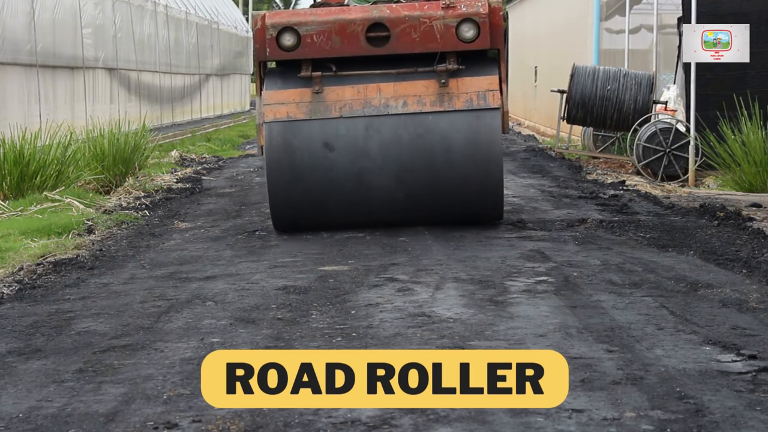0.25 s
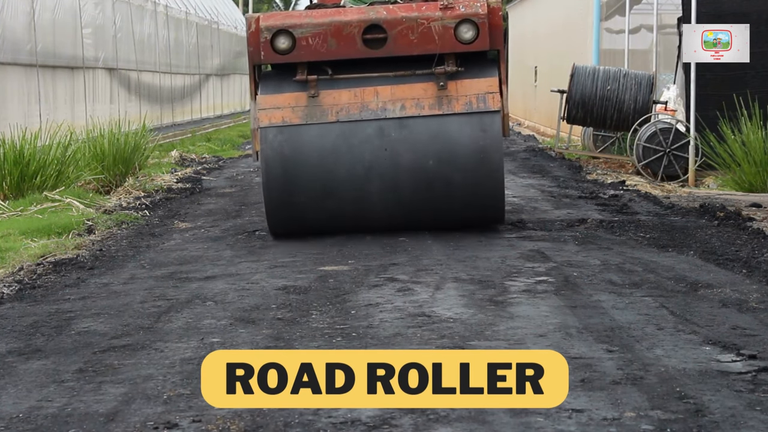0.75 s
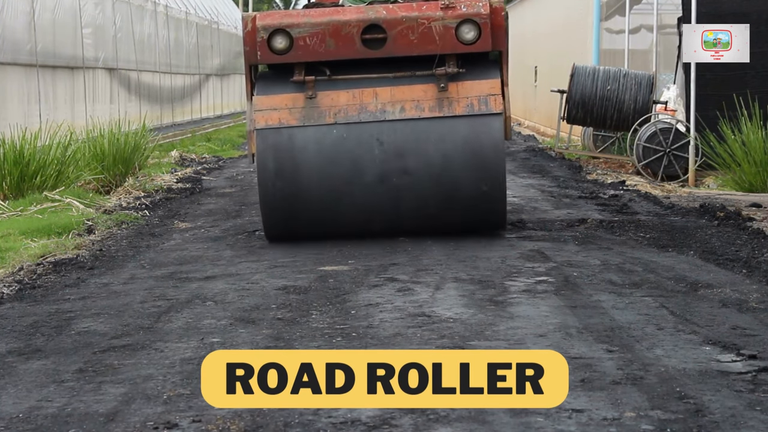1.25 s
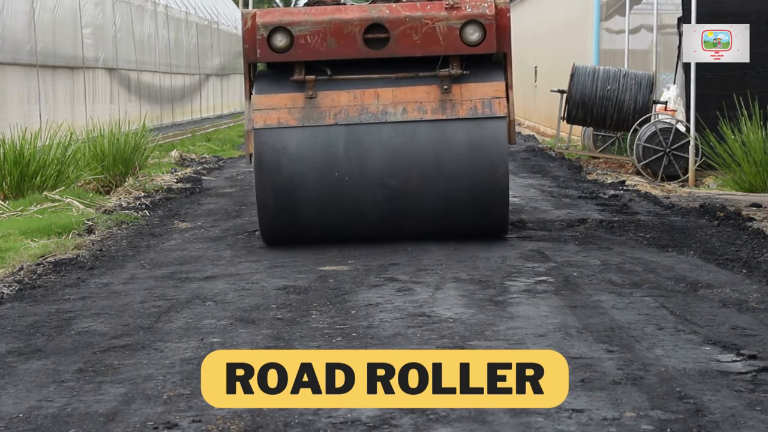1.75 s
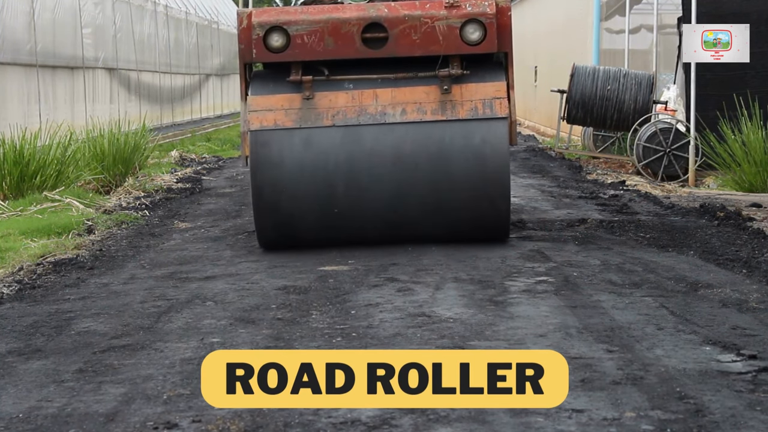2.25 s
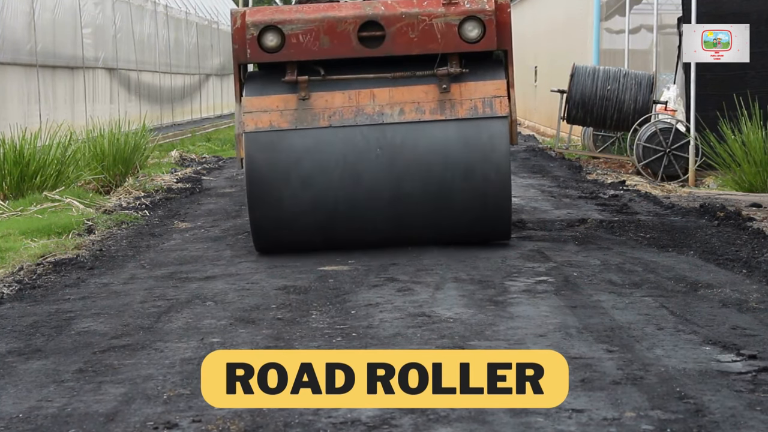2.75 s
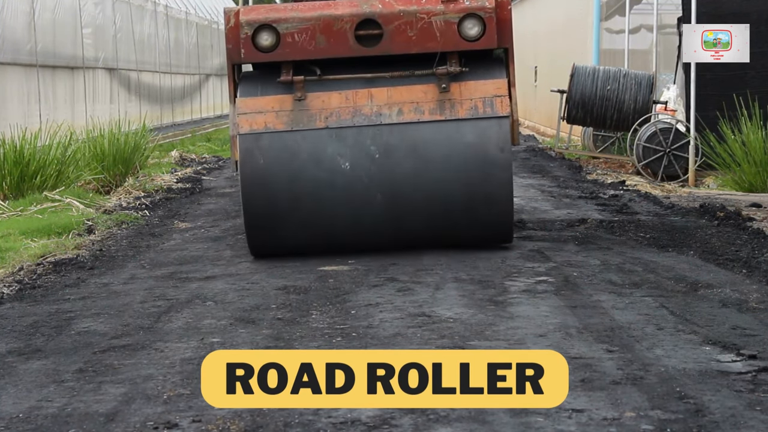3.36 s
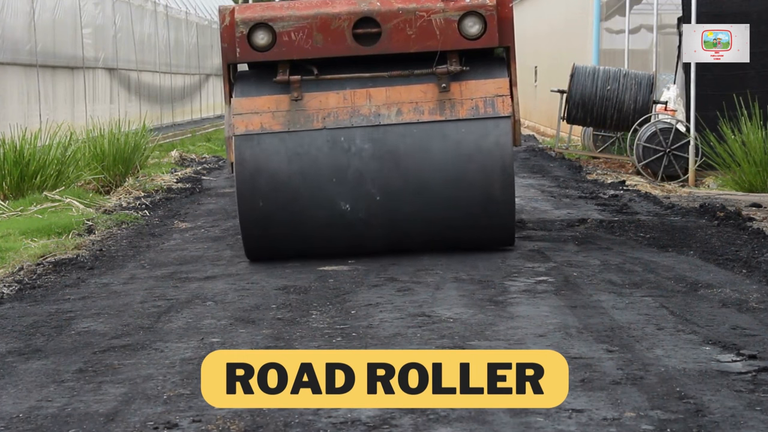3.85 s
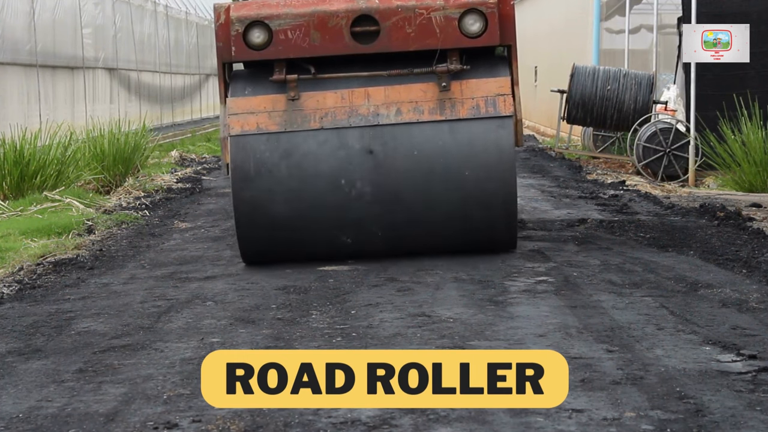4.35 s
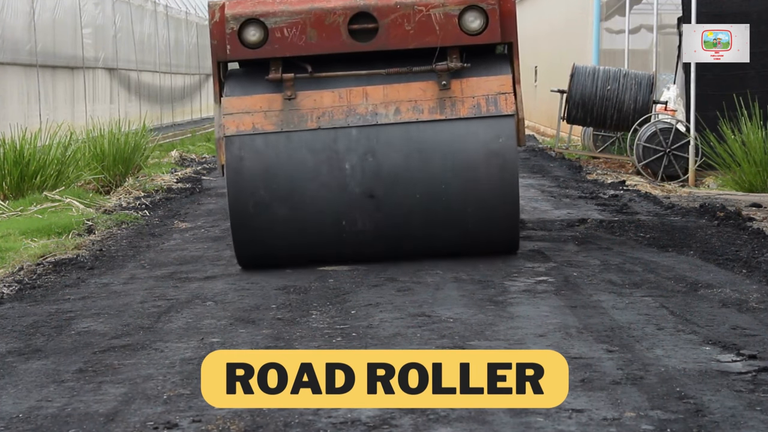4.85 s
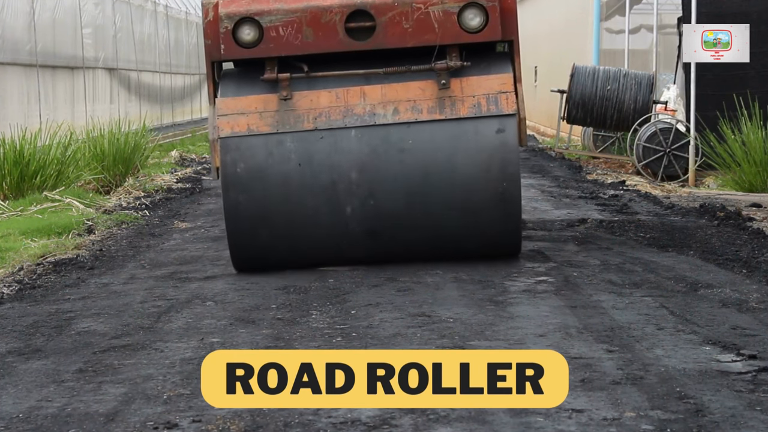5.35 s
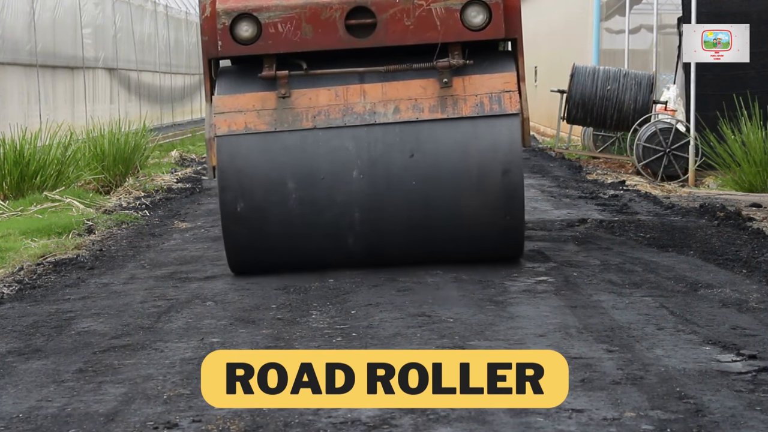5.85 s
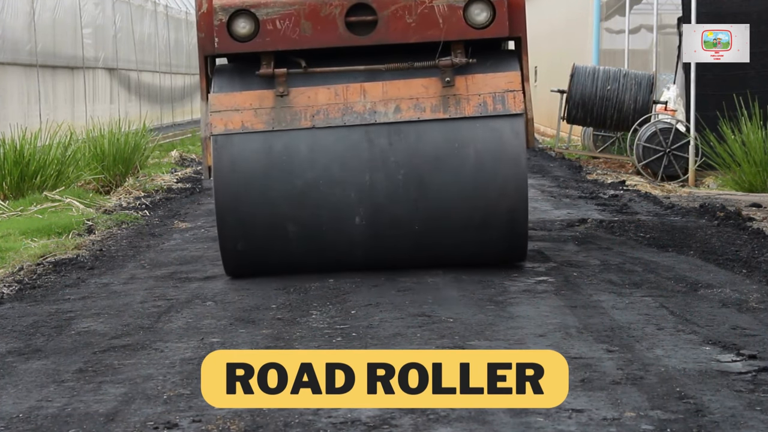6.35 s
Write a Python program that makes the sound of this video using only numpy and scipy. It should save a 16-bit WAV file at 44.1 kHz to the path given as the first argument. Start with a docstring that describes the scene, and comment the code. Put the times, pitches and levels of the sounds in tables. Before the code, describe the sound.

The diesel engine of a small road roller chugs throughout, its pump humming and dipping slightly in pitch under load. Over it the steel drum crunches across fresh asphalt, with clusters of cracking stones, short rumbles and faint thin metal squeaks. One brief falling creak comes near the end. It is heard from nearby in stereo, outdoors between walls that add a very short echo.

```python
"""A lane between sheds, with a small road roller at work.
Its diesel throbs and clatters at multiples of the firing rate, and the hydraulic pump hums in step.
Stones grind and crack under the steel drum and excite its modes; friction at the scraper makes the
shell squeak, and near the end the frame creaks once. The walls reflect a short blur of the drum."""
import sys
import numpy as np
from scipy import signal
from scipy.fft import rfft, irfft, next_fast_len
from scipy.io import wavfile
from scipy.ndimage import uniform_filter1d

SR = 44100
rng = np.random.default_rng(int(sys.argv[2]) if len(sys.argv) > 2 else 0)


def master(y):
    """Save y as 16-bit WAV."""
    cut = np.clip(np.atleast_2d(y).T, -1, 1)
    pcm = np.round(cut * 32767)  # scale
    wavfile.write(sys.argv[1], SR, pcm.astype(np.int16))


N = 290879
TIME = np.arange(N) / SR
TAIL = np.arange(SR // 4) / SR  # time within one decay, s


def gain_of(db):
    """Amplitude ratio of a level in decibels."""
    return 10 ** (np.asarray(db) / 20)

def unit_rms(x):
    """Normalisation to rms 1."""
    return x / np.sqrt(np.mean(x ** 2) + 1e-20)

def spectrum_at(points, hz):
    """Interpolation on a logarithmic frequency axis."""
    f, value = np.transpose(points)
    return np.interp(np.log(hz + 1), np.log(f + 1), value)

def coloured(x, points):
    """Minimum-phase filter of unit energy, shaped by a dB spectrum."""
    log_gain = spectrum_at(points, abs(np.fft.fftfreq(8192, 1 / SR))) * np.log(10) / 20
    taps = np.fft.ifft(np.exp(np.conj(signal.hilbert(log_gain)))).real[:4096]
    return signal.oaconvolve(x, taps / np.linalg.norm(taps))[:len(x)]

def passband(x, hz, kind, order=3):
    """Maximally flat filter."""
    return signal.sosfilt(signal.butter(order, hz, kind, fs=SR, output="sos"), x)

def resonate(x, hz, width):
    """Damped resonance: a double pole, gain 1 at its centre."""
    radius = np.exp(-np.pi * width / SR)
    pole = [1, -radius * np.exp(2j * np.pi * hz / SR)]
    return 2 * signal.lfilter([1 - radius], pole, signal.lfilter([1 - radius], pole, x)).real

def drift(per_s):
    """Low-pass random fluctuation, rms 1."""
    span = max(round(SR / per_s), 2)
    return unit_rms(uniform_filter1d(uniform_filter1d(rng.standard_normal(N), span), span))

def tone(turns, db, waver_db, per_s):
    """Sinusoid with random amplitude modulation about an rms level."""
    return -np.sqrt(2) * gain_of(db + waver_db * drift(per_s)) * np.cos(2 * np.pi * turns)

def splinters(per_s, spread_db):
    """Shot noise: small fractures of uneven size, rms 1."""
    size = gain_of(spread_db * np.minimum(rng.exponential(1, N), 4))
    return unit_rms(size * rng.standard_normal(N) * (rng.random(N) < per_s / SR))

def swells(starts, holds, dbs, floor_db, rise_db_per_s=234, fall_db_per_s=101):
    """Power sum of a steady floor and envelopes that rise, hold and fall."""
    t = np.arange(0, N + 64, 64)[:, None] / SR
    db = dbs - rise_db_per_s * np.maximum(starts - t, 0)
    db -= fall_db_per_s * np.maximum(t - starts - holds, 0)
    return np.interp(TIME, t[:, 0], np.sqrt(gain_of(floor_db) ** 2 + (gain_of(db) ** 2).sum(1)))


# Pump frequency, which follows the engine and sags under load: t/s, f/Hz
PUMP_SPEED = [(0, 255), (.2, 256.5), (.5, 249.5), (1, 258.5), (1.3, 253.5), (1.8, 252), (2.2, 259.5),
              (2.45, 247.5), (2.72, 260), (3.25, 258), (3.55, 244.5), (4.3, 245), (5, 249.5), (5.4, 257),
              (5.7, 254.5), (6.6, 257)]
PULSES_PER_FIRING = 4.72

def exhaust():
    """Periodic firing radiates three harmonics; returns their sound and the firing phase in turns."""
    free_hz, full_sag_hz, governor_s, load_db_per_hz = 260, 24, 0.096, 0.72
    silencer_hz, silencer_width_hz = 164, 4.2
    pump_hz = np.interp(TIME, *np.transpose(PUMP_SPEED))
    firings = np.cumsum(pump_hz) / SR / PULSES_PER_FIRING
    sag_hz = free_hz - np.interp(TIME - governor_s, TIME, pump_hz)
    # load swells the throb, a little late
    throb_db = -27.5 + load_db_per_hz * full_sag_hz * np.tanh(sag_hz / full_sag_hz)
    second_db = throb_db.mean() - 12 + 0.78 * (throb_db - throb_db.mean())
    # the third harmonic peaks as it meets the silencer's resonance
    detuning = 2 * (3 * pump_hz / PULSES_PER_FIRING - silencer_hz) / silencer_width_hz
    third_db = -29 - 10 * np.log10(1 + detuning ** 2)
    throb = tone(firings, throb_db, waver_db=1.2, per_s=25)
    return throb + tone(2 * firings, second_db, 3.5, 14) + tone(3 * firings, third_db, 3.1, 12), firings


# Tones geared to the pump: f/pump frequency, level/dB
GEAR_TONES = [(1.428, -36.5)]

def hydraulic_pump(firings):
    """Pressure pulsation: a hum tied to engine speed, wandering slightly in phase."""
    turns = firings * PULSES_PER_FIRING + 0.081 * drift(8.2)
    hum = tone(turns, -26.5, waver_db=0.94, per_s=14)
    return hum + sum(tone(ratio * turns, db, 3.5, 10) for ratio, db in GEAR_TONES)


# Spectral density of the machine's noise: f/Hz, relative level/dB
ROAR_SPECTRUM = [(18, -45), (33, 7.5), (80, -4.5), (130, 1.5), (225, -10.5), (290, -7), (500, -7.5),
                 (1100, -10.5), (2000, -21), (2800, -34), (5400, -31), (7200, -44), (12400, -107.5)]
# Modes of the engine block: f/Hz, width/Hz, gain/dB
BLOCK_MODES = [(615.5, 84, -3), (2040, 305, 0.5), (3400, 870, 3), (5340, 460, -3)]

def machine_roar(firings, coherence):
    """Partly coherent stereo noise excites the block; above 350 Hz it knocks twice a firing."""
    size = 2 * (len(coherence) - 1)
    shared, *own = rfft(rng.standard_normal((3, N)), size)
    noise = irfft(np.sqrt(coherence) * shared + np.sqrt(1 - coherence) * np.array(own), size)[:, :N]
    body = np.array([coloured(side, ROAR_SPECTRUM) for side in noise])
    body += sum(gain_of(db) * resonate(body, hz, width) for hz, width, db in BLOCK_MODES)
    clatter = passband(body, 350, "high", order=2)
    knock = gain_of(1.8 * np.cos(4 * np.pi * firings) + .8 * drift(25))
    return gain_of(-21.5 + 0.81 * drift(6.3)) * (body + (knock - 1) * clatter)


# Spectral density of breaking stone: f/Hz, relative level/dB
STONE_SPECTRUM = [(120, 2), (300, 8), (800, -2), (1150, -2.5), (1750, -0.5), (2780, -9), (4080, -19.5),
                  (6630, -26.5), (10500, -42), (12400, -49.5), (15000, -70)]
# Stone yielding in surges: t/s, hold/s, grinding level/dB, rumble drive/dB, favoured rumble f/Hz
STONE_SURGES = [(0.468, 0.075, -21, -14.5, 213), (0.757, 0.056, -21.5, -39, 252),
                (1.77, 0.019, -19.5, -16, 260), (2.355, 0.21, -31, -39, 202),
                (3.103, 0.071, -18.5, -14.5, 433), (3.355, 0.14, -23, -22, 179),
                (3.515, 0.82, -27.5, -44, 240), (4.394, 0.072, -20.5, -18.5, 600),
                (4.56, 0.038, -17, -21, 300), (4.604, 0.024, -21.5, -18, 302),
                (4.995, 0.044, -25, -20, 200), (5.173, 0.28, -25.5, -30.5, 300),
                (5.434, 0.045, -20, -16.5, 249), (6.416, 0.046, -26.5, -26, 257)]

def grinding():
    """Dense microfractures merge into noise; pebbles rattle under the same surging envelope."""
    pebble_t60_s = 0.048
    start, hold, grind_db, _, _ = np.transpose(STONE_SURGES)
    pressing = swells(start, hold, grind_db, floor_db=-30.5)
    grind = gain_of(1.5 * drift(40)) * coloured(splinters(7000, 1.1), STONE_SPECTRUM)
    hits = abs(splinters(per_s=280, spread_db=1.0))
    pebbles = signal.oaconvolve(hits, gain_of(-60 * TAIL / pebble_t60_s))[:N] * rng.standard_normal(N)
    grit = unit_rms(passband(pebbles, [1800, 5500], "band"))
    return pressing * (grind + gain_of(-13) * grit)


# Low modes of the drum shell: f/Hz, width/Hz, gain/dB
DRUM_MODES = [(120, 153, 1.5), (180, 49, 2), (297.4, 57, 0), (435.4, 27, -5), (839, 58, 3)]

def drum_rumble():
    """Forced vibration: small blows drive the shell, most near each surge's favoured frequency."""
    start, hold, _, drive_db, favoured_hz = np.transpose(STONE_SURGES)
    blows = splinters(per_s=1500, spread_db=1.5)
    blows[np.round(start * SR).astype(int)] = gain_of(37.5)  # a thud opens each surge
    rumble = np.zeros(N)
    for hz, width, db in DRUM_MODES:
        octaves = abs(np.log2(hz / favoured_hz))
        drive = swells(start, hold, drive_db - 14 * octaves, floor_db=-32)
        rumble += gain_of(db) * resonate(drive * blows, hz, width)
    return gain_of(17.5) * rumble


# Single stones breaking: t/s, relative level/dB, ring f/Hz, brightness/dB, T60/s
STONE_CRACKS = [(0.3693, -13.5, 1860, -15.5, 0.097), (0.4548, -18, 1560, -28, 0.2),
                (0.5065, -5, 1450, -20, 0.12), (0.525, -18, 2090, -23, 0.14), (0.742, -15, 2110, -16, 0.13),
                (0.758, -5.5, 1990, -18, 0.07), (0.794, -3.5, 1820, -22.5, 0.054),
                (0.835, -16, 1760, -17, 0.17), (1.672, -10, 1640, -19, 0.18),
                (1.774, 0.5, 1650, -19.5, 0.11), (1.855, -12.5, 1580, -20.5, 0.065),
                (2.325, -14.5, 1770, -12.5, 0.15), (2.379, -12, 1850, -23, 0.14),
                (2.4142, -11.5, 1700, -20, 0.25), (3.0768, -4.5, 1690, -21.5, 0.13),
                (3.089, -7.5, 1930, -15, 0.034), (3.1095, -8, 1720, -31, 0.027),
                (3.123, -19, 1720, -29, 0.034), (3.1732, -8, 1570, -23.5, 0.23),
                (3.3523, -0.5, 1720, -18, 0.17), (3.4458, -0.5, 2050, -17, 0.16),
                (3.7844, -12.5, 2110, -10.5, 0.1), (4.082, -16.5, 1640, -11.5, 0.091),
                (4.388, -2.5, 960, -16.5, 0.16), (4.514, -14, 1480, -9, 0.13),
                (4.5338, -10, 1800, -11, 0.16), (4.576, -8, 1430, -14.5, 0.13),
                (4.605, -3, 1450, -13.5, 0.11), (4.632, -7, 1470, -17.5, 0.11),
                (4.662, -20, 1520, -3.5, 0.1), (4.922, -5.5, 2150, -19.5, 0.11),
                (4.991, -6.5, 1450, -16, 0.2), (4.9988, -4, 1640, -19.5, 0.1),
                (5.0458, -1.5, 1440, -13.5, 0.16), (5.109, -17.5, 1310, -8, 0.16),
                (5.167, -6, 1590, -15.5, 0.094), (5.3707, -15.5, 1480, -6.5, 0.1),
                (5.427, -12, 1450, -23, 0.15), (5.4471, -3, 1510, -12.5, 0.058),
                (5.5146, -2, 1720, -15.5, 0.11), (6.059, -16.5, 1730, -24.5, 0.08),
                (6.112, -13, 1190, -15, 0.17), (6.1837, -8, 2610, -10.5, 0.13),
                (6.333, -16.5, 1230, -9, 0.082), (6.4014, -0.5, 1800, -22.5, 0.13)]
# Higher modes of the steel, excited by every crack: f/Hz, width/Hz, gain/dB
CLANG_MODES = [(2525, 280, -12), (3310, 510, -9), (5000, 880, -24.5), (6700, 500, -21.5)]

def stone_cracks():
    """Brittle fracture: a snap and a decaying spray of splinters set the steel ringing."""
    dull, bright, ring = np.zeros((3, N + SR))
    chips = splinters(per_s=11000, spread_db=1.8)
    snaps = np.round(np.array(STONE_CRACKS)[:, 0] * SR + 26).astype(int)
    chips[snaps] = gain_of(15.5)  # the stone snaps before it splinters
    attack_s, bite_s, snap_s = 0.0016, 0.004, 0.0015
    for start, db, hz, bright_db, t60 in STONE_CRACKS:
        spray = gain_of(db - 60 * TAIL / t60) * np.minimum(TAIL / attack_s, 1)
        spray *= 1 + .7 * np.exp(-TAIL / bite_s)
        part = slice(round(start * SR), round(start * SR) + len(TAIL))
        dull[part] = np.hypot(dull[part], spray)
        bright[part] = np.hypot(bright[part], gain_of(bright_db) * spray)
        blow = np.resize(chips[part], len(TAIL)) * spray * (1 + gain_of(-4) * np.exp(-TAIL / snap_s))
        blow[0] = gain_of(db + 20.5)  # the opening strike
        dullness_db = -15 - bright_db  # dull cracks ring more and clang less
        ring[part] += gain_of(dullness_db) * resonate(blow, hz, width=400)
        for mode_hz, width, mode_db in CLANG_MODES:
            ring[part] += gain_of(mode_db - dullness_db / 2) * resonate(blow, mode_hz, width)
    low = passband(coloured(chips * dull[:N], STONE_SPECTRUM), [600, 4000], "band")
    high = passband(coloured(chips * bright[:N], STONE_SPECTRUM), 4000, "high")
    return gain_of(-8.5) * low + gain_of(16) * high + gain_of(-1) * ring[:N]


# Narrow high modes of the shell: f/Hz
SQUEAK_MODE_HZ = [5180, 6858, 7655, 8188, 8463, 9615, 10420, 12285]
# Strengths of those modes: gain/dB
SQUEAK_MODE_DB = [11, 7, 9.5, 6, 7.5, 3, -8, -3]
# The scraper catching on the shell: t/s, hold/s, drive level/dB, favoured f/Hz
SCRAPER_CATCHES = [(0.578, 0.11, -60, 7700), (1.81, 0.075, -53.5, 9400), (2.538, 0.06, -56, 9000),
                   (2.597, 0.042, -54.5, 7700), (3.237, 0.38, -61.5, 8900), (3.836, 0.027, -53, 8300),
                   (4.148, 0.018, -50, 9400), (4.405, 0.079, -51, 7540), (4.726, 0.011, -55, 8200),
                   (5.043, 0.016, -49, 8700), (5.227, 0.036, -48, 5200), (5.37, 0.34, -65, 8500),
                   (6.41, .05, -63, 8700)]

def scraper():
    """Frictional excitation: rubbing feeds the shell's high modes, each flickering on its own."""
    start, hold, level_db, favoured_hz = np.transpose(SCRAPER_CATCHES)
    squeaks = np.zeros(N)
    for hz, db in zip(SQUEAK_MODE_HZ, SQUEAK_MODE_DB):
        octaves = np.log2(hz / favoured_hz)
        drive_db = level_db - np.maximum(6 * octaves, -26 * octaves)
        drive = swells(start, hold, drive_db, floor_db=-79, rise_db_per_s=512, fall_db_per_s=280)
        squeaks += drive * tone(hz * TIME + 0.23 * drift(60), db, waver_db=4.5, per_s=43)
    return squeaks


def frame_creak():
    """Frictional slip in the frame: one rough tone gliding down."""
    start_s, length_s, from_hz, to_hz = 6, 0.4, 2451, 1952
    progress = np.clip((TIME - start_s) / length_s, 0, 1)
    turns = np.cumsum(from_hz + (to_hz - from_hz) * progress) / SR
    return np.sin(np.pi * progress) * tone(turns, -30, waver_db=2, per_s=200)


def wall_reflections(direct, t60_s=.12):
    """Reverberation: convolution with sparse, exponentially decaying echoes."""
    signs = rng.choice([-1., 1.], len(TAIL))
    echoes = signs * (rng.random(len(TAIL)) < .06) * gain_of(-60 * TAIL / t60_s)
    return signal.fftconvolve(direct, echoes / np.linalg.norm(echoes))[:N]


# Likeness of left and right: f/Hz, coherence/1
STEREO_COHERENCE = [(60, 0.66), (500, 0.92), (1400, 1), (4000, 0.69), (9000, 0.44)]

def scene():
    """Superposition: direct tones arrive in phase left and right, the reflections in antiphase."""
    size = 2 * next_fast_len(N // 2 + 1)
    coherence = np.clip(spectrum_at(STEREO_COHERENCE, np.fft.rfftfreq(size, 1 / SR)), 0, 1)
    throb, firings = exhaust()
    hum = hydraulic_pump(firings)
    direct = stone_cracks() + grinding() + drum_rumble() + scraper() + frame_creak()
    mid = irfft(np.sqrt((1 + coherence) / 2) * rfft(direct, size), size)[:N]
    side = irfft(np.sqrt((1 - coherence) / 2) * rfft(wall_reflections(direct), size), size)[:N]
    return throb + hum + machine_roar(firings, coherence) + np.array([mid + side, mid - side])


# Level difference of the microphone ports, left minus right: f/Hz, level/dB
PORT_BALANCE = [(60, 5.5), (170, 0.5), (400, -1.5), (2500, -3), (8000, -2)]
# Phase lead of the left port: f/Hz, phase/rad
PORT_PHASE = [(100, -0.16), (340, -0.5), (600, 0.25), (1380, -0.5), (4480, -0.53), (6500, -0.2)]

def record(dry):
    """Transduction: two ports of unequal response, soft saturation of peaks, then a band limit."""
    size = next_fast_len(N)
    hz = np.fft.rfftfreq(size, 1 / SR)
    left = gain_of(spectrum_at(PORT_BALANCE, hz) / 2) * np.exp(.5j * spectrum_at(PORT_PHASE, hz))
    ports = irfft(rfft(dry, size) * np.array([left, 1 / left]), size)[:, :N]
    rounded = ports / (1 + ports ** 4) ** .25
    lowpass = signal.firwin(511, cutoff=15250, window=("kaiser", 9), fs=SR)
    return signal.oaconvolve(rounded, lowpass[None], "same")


dry = scene()
out = record(dry)
master(out)
```